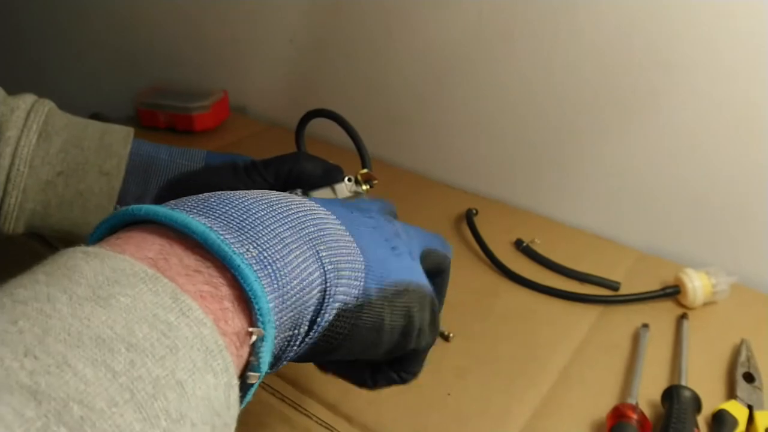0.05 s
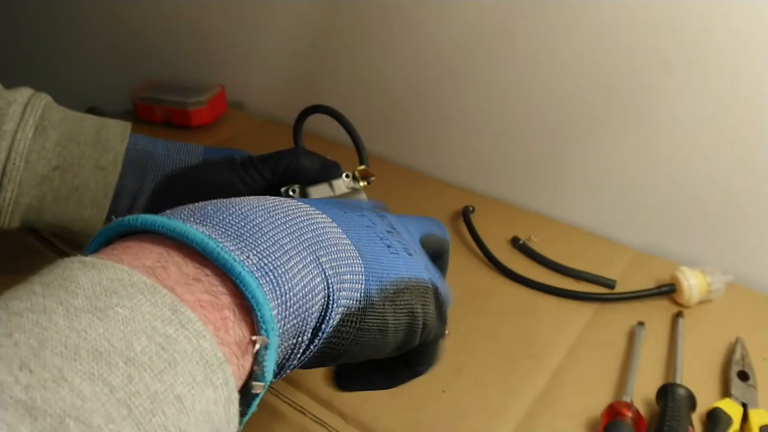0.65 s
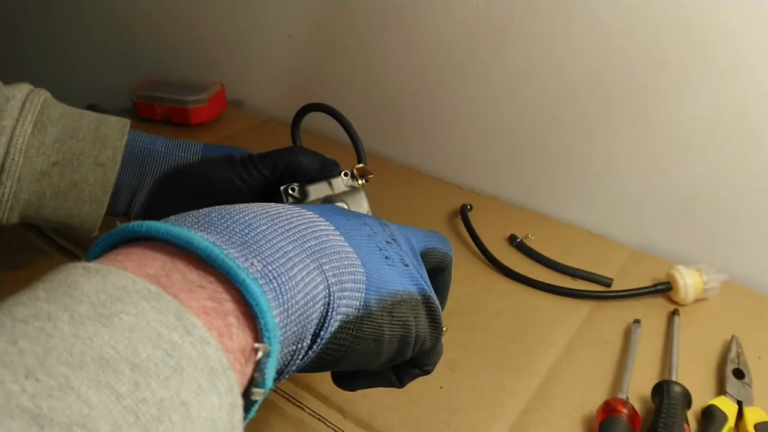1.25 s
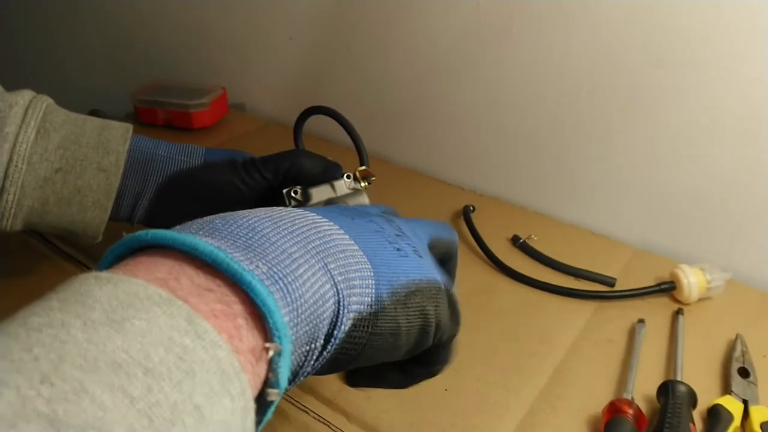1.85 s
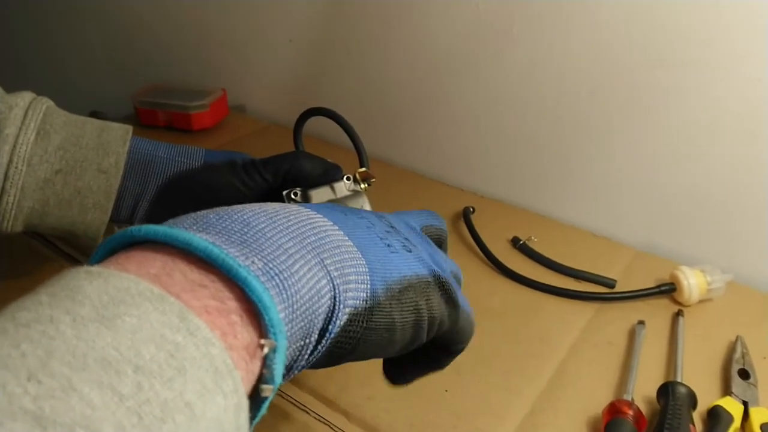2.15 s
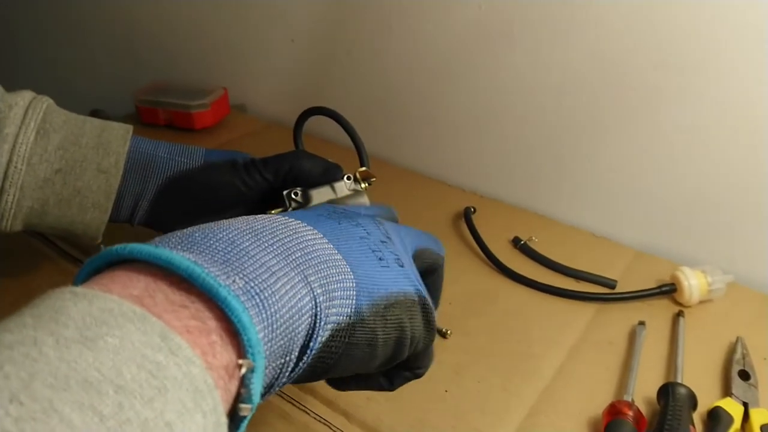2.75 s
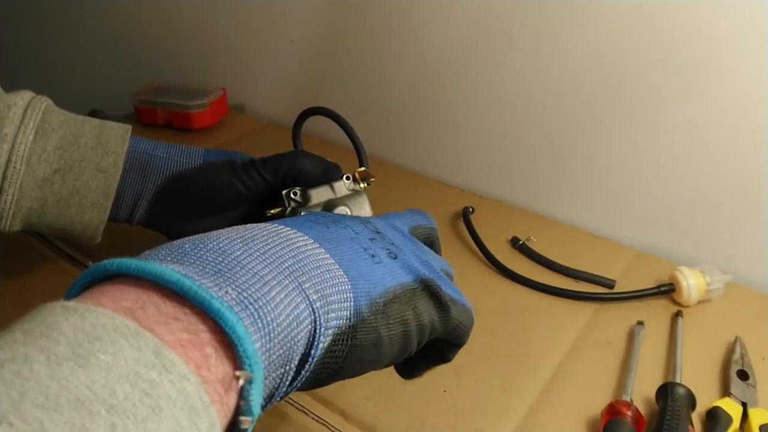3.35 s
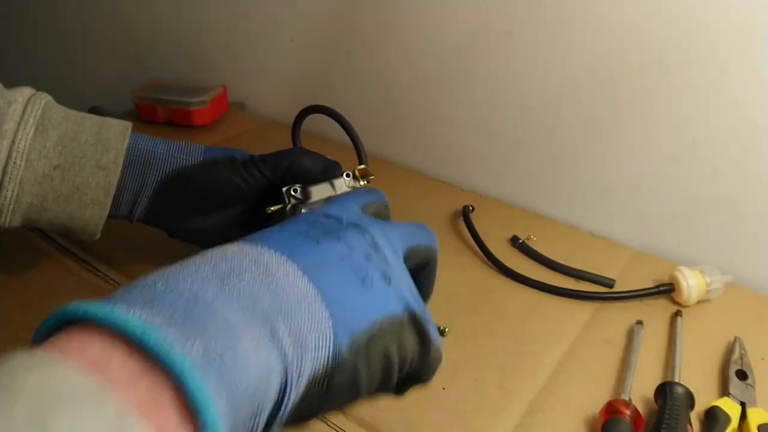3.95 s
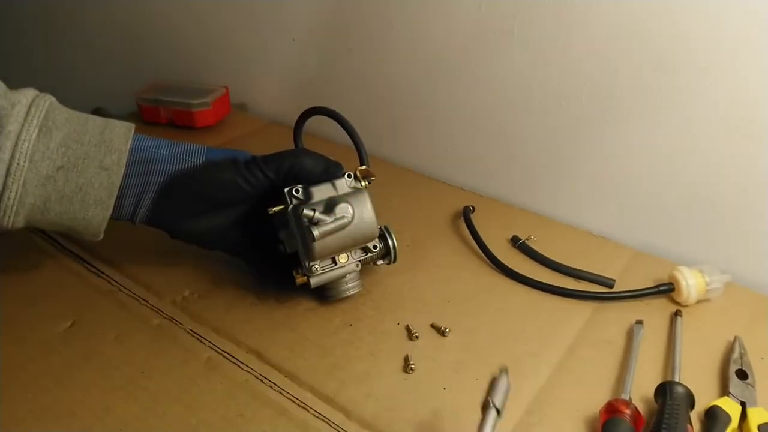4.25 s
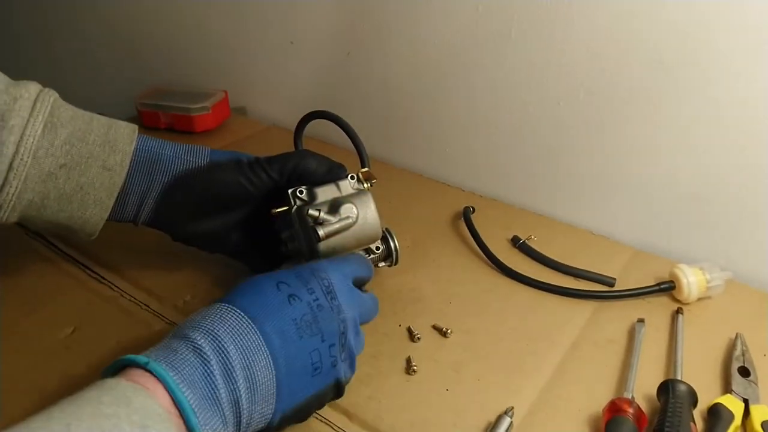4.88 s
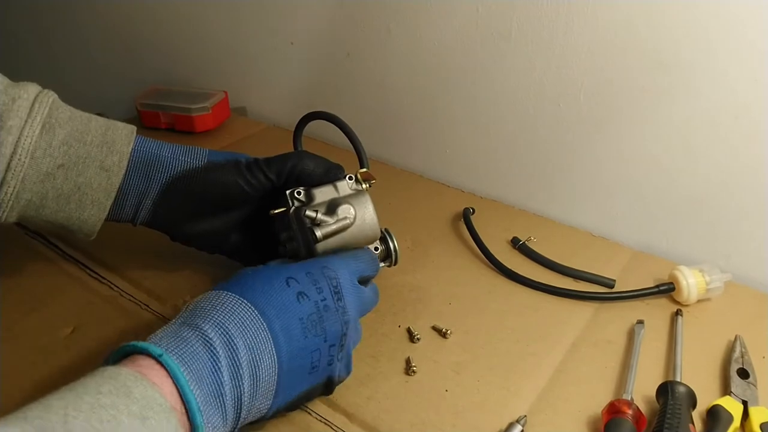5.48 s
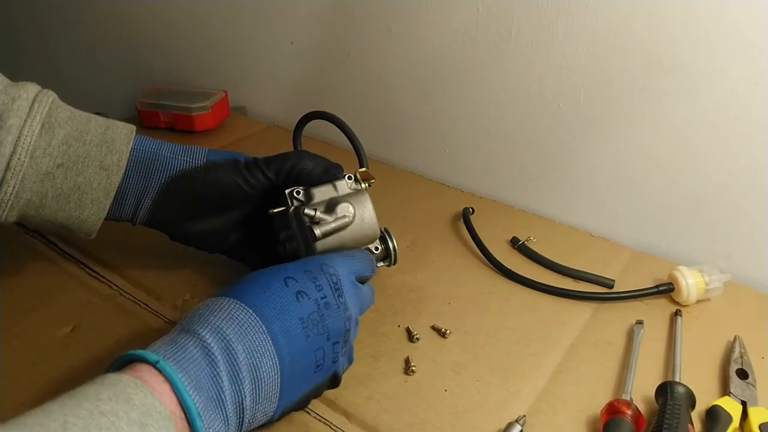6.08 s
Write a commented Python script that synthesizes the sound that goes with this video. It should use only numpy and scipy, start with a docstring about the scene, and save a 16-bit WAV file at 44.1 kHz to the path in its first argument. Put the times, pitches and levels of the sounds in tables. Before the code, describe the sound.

A screwdriver ticks and scrapes on a small metal part, lands on a workbench with a knock, and gloved fingers click on metal.

```python
"""A cardboard-covered workbench in a small, quiet room: gloved hands undo screws on a small carburettor.
Close to the microphone, the bit clicks and scrapes in the screw heads and rings the casting.
Gloves rub, sleeves swish, the bench rocks with each turn. The screwdriver is put down
(its shank clinks, its handle knocks), then fingers click on the metal parts."""
import sys
import numpy as np
from scipy import signal
from scipy.fft import rfft, irfft
from scipy.io import wavfile
from scipy.ndimage import uniform_filter1d

SR = 44100
rng = np.random.default_rng(int(sys.argv[2]) if len(sys.argv) > 2 else 0)


def pcm_store(signal):
    """Save signal as 16-bit PCM."""
    levels = np.round(np.clip(np.atleast_2d(signal), -1, 1) * 32767)
    wavfile.write(sys.argv[1], SR, levels.astype(np.int16).T)


N = 269803
TIME_S, HIT_TIME_S = np.arange(N) / SR, np.arange(SR) / SR
SCREW_OUT_S, SHANK_S, HANDLE_S = 4.31, 4.5152, 4.583

# Table levels are relative.
# bit and fingers on metal: (time [s], ring [dB], ring focus [Hz], bright edge [dB], tap [dB], thump [dB])
CLICKS = [(0.0296, -40, 4020, -78, -49.5, -47), (0.6474, -46, 4200, -78, -71, -58.5),
          (0.7365, -43.5, 5160, -59, -54.5, -49), (1.1603, -37, 4600, -55, -48.5, -48.5),
          (1.1728, -49, 4400, -64, -55, -42.5), (1.2103, -33.5, 4400, -51.5, -55.5, -63),
          (1.2619, -55, 3000, -75, -51, -51), (1.4338, -38, 4300, -76, -61.5, -70),
          (1.5976, -45.5, 2400, -85, -62, -74), (1.8051, -50.5, 4000, -68, -62, -58),
          (1.9135, -29.5, 4310, -59, -48.5, -46), (1.9788, -37.5, 4340, -59, -61, -56),
          (2.0919, -47, 4000, -81, -63.5, -64), (2.214, -44, 4110, -69, -63, -62),
          (2.3174, -48, 4400, -60, -60, -49.5), (2.6583, -53, 4000, -76.5, -66, -48),
          (2.7458, -51, 3030, -82, -68, -49.5), (2.9555, -54, 4000, -78, -75, -59),
          (3.022, -39, 4450, -60, -61.5, -45.5), (3.414, -47.5, 3980, -80, -78, -58),
          (3.5221, -33, 5000, -46, -53, -43), (3.5928, -31.5, 4400, -73, -62, -50),
          (3.9503, -40.5, 4360, -67, -69, -65), (4.6655, -37.5, 3700, -70, -57, -44),
          (4.7393, -36.5, 3640, -78, -55, -38), (4.7547, -37, 3680, -64, -53, -38.5),
          (4.8755, -35, 3720, -59, -56, -42.5), (4.8984, -44.5, 3700, -64, -58.5, -43),
          (4.9655, -48, 2400, -71, -51.5, -47), (4.9752, -31.5, 3230, -75, -51.5, -40.5),
          (5.037, -33, 5130, -45, -67, -52), (5.171, -42.5, 3700, -81.5, -60, -47),
          (5.1884, -43.5, 3700, -77, -61, -43), (5.211, -55, 3700, -79, -63.5, -43.5),
          (5.4014, -50.5, 4020, -83, -68.5, -64), (5.7234, -24.5, 4940, -36.5, -57.5, -72)]
# metal sliding on metal: (peak time [s], swell [s], fall [s], level [dB])
STROKES = [(.008, .005, .012, -59), (.308, 0.011, 0.017, -57.5), (.383, 0.025, 0.013, -58),
           (.748, 0.043, 0.033, -60.5), (1.158, 0.04, 0.017, -56), (1.528, 0.029, 0.012, -56),
           (1.893, 0.003, 0.041, -52), (1.995, .01, 0.022, -54.5), (2.222, .008, 0.0073, -58.5),
           (2.312, 0.029, 0.019, -56), (2.675, 0.022, 0.019, -56.5), (3.092, 0.03, 0.013, -54.5),
           (3.52, 0.037, 0.023, -56.5), (3.829, 0.0075, 0.013, -60), (3.92, 0.0077, 0.028, -48.5),
           (4.03, 0.011, 0.012, -63), (5.2, 0.025, 0.011, -61), (5.52, 0.011, 0.02, -64.5),
           (5.723, 0.0018, 0.0031, -41.5)]
# hand twists and leans on the bench: (time [s], hold [s], glove rub [dB], rocking [dB])
PUSHES = [(0.032, .02, -55, -49), (.13, .04, -70, -53), (.375, .07, -58, -47), (0.555, 0.008, -69, -56),
          (0.663, .01, -62, -60), (0.749, 0.033, -54, -49.5), (1.11, .03, -66, -56), (1.175, .06, -55, -46),
          (1.26, .01, -55, -48), (1.49, 0.085, -64, -57), (1.598, .04, -64, -47), (1.819, .02, -58, -56),
          (1.97, .06, -54, -45.5), (2.117, 0.014, -70, -47.5), (2.225, .03, -59, -49),
          (2.33, .02, -53, -48.5), (2.665, .02, -53, -50.5), (2.76, .04, -63, -42), (2.96, .03, -72, -53.5),
          (3.04, .17, -53, -52), (3.375, 0.044, -79, -54.5), (3.52, .13, -57, -44.5), (3.84, .03, -67, -54),
          (3.927, 0.062, -56, -44.5), (4.77, .02, -70, -42), (5.2, .03, -70, -50), (5.477, .01, -81, -58),
          (5.977, 0.017, -82, -57.5)]
# forearm shifts: (peak time [s], swell and fall [s], level [dB])
SWISHES = [(0, 0.057, -56), (.33, .05, -65), (.85, .12, -61), (1.12, 0.085, -60), (1.5, 0.1, -64.5),
           (1.9, 0.16, -61), (2.5, .09, -74), (3.98, 0.096, -63.5), (4.2, .12, -67)]

# modes: (frequency [Hz], level [dB], t60 [s])
CASTING_MODES = [(2477, -9, 0.075), (3063, -5, 0.036), (3400, -9, 0.06), (4270, 2.5, 0.035),
                 (4506, -3, 0.04), (4990, 2, 0.033), (6870, -12, .025)]
CARDBOARD_MODES = [(104.6, -1.5, 0.17), (133.4, -3.5, 0.2), (190.4, 0.5, 0.2), (259, -7.5, 0.058),
                   (287.5, -10.5, 0.092), (368.3, -7.5, 0.14), (487, -12, 0.069)]
SHANK_MODES = [(800, -16, 0.069), (1037, -18.5, 0.064), (1540, -23, 0.11), (2720, -19, 0.083),
               (3130, -2.5, 0.028), (3460, 0.5, 0.035), (3790, -3, 0.041), (4460, -8.5, .03),
               (4900, -6, 0.034), (6630, -10, 0.045), (7100, -13.5, 0.073)]
BENCH_MODES = [(119, -9, .4), (158, 0, .55), (192, -5, .3), (296, -7, .4), (342, -11, .33), (425, -12, .38),
               (501, -5, .25), (525, -7, .25), (563, -9, .3), (641, -15, .4), (686, -16, .38),
               (765, -9, .4), (819, -11, .31), (1031, -13, .25)]

# spectra: (frequency [Hz], level [dB])
CHATTER_EQ = [(900, -26), (2000, -5), (3300, 6.5), (4800, 1), (6000, -5.5), (7200, -10.5), (8500, -22),
              (14000, -28)]
EDGE_EQ = [(3500, -20.5), (5200, 4.5), (7200, 7), (8500, -2), (11000, -11), (13500, -7), (15300, -6)]
TAP_EQ = [(120, -6.5), (330, -3), (470, 0.5), (600, 4), (780, 0), (1100, -1), (1400, -5.5), (2200, -7.5),
          (3500, -29)]
SCRAPE_EQ = [(700, -13.5), (1700, -6), (2600, -1), (4200, -1.5), (5200, -6), (7200, -4.5), (8300, -14.5),
             (12000, -22.5), (15500, -23)]
CLINK_EQ = [(120, -26.5), (200, 7), (299, -22), (777, -7), (933, -14), (1100, -12.5), (1940, -19.5),
            (3490, -2.5), (5630, -13), (6760, -15.5), (10500, -29), (11100, -50.5), (12400, -30),
            (16000, -45)]
CRACK_EQ = [(150, -12), (500, 1), (1100, -0.5), (1500, -1.5), (2000, 3), (2350, -3), (4200, -4),
            (6500, -11.5), (9000, -22.5), (15000, -33)]
BOARD_EQ = [(50, -23), (95, 6), (150, 1.5), (195, 5), (270, 3), (380, -14), (520, -4.5), (680, -10),
            (900, -9), (1300, -18), (2500, -29), (6000, -48.5)]
SLEEVE_EQ = [(300, -13), (700, 4.5), (1000, -4.5), (1350, 2), (1700, -8), (2500, -4.5), (3500, -5),
             (5000, -11.5), (12000, -36)]
AIR_EQ = [(35, -27), (60, 0), (83, -2), (118, -10.5), (285, -22), (1100, -23.5), (1630, -23.5), (3580, -24),
          (7030, -28), (15500, -36.5)]
WEIGHT_EQ = [(60, -11), (200, 3), (700, -1), (1200, -12.5), (2500, -27), (5000, -23), (12000, -50)]
GLOVE_EQ = [(120, -19.5), (250, -9), (350, 4), (480, -3), (620, -10.5), (1500, -27), (4000, -43)]
ROOM_EQ = [(80, -14.5), (300, 1), (900, .5), (1700, -1.5), (3500, -1), (7000, -3), (15000, .5)]
# microphone ports: (frequency [Hz], left minus right [dB])
PORT_BALANCE = [(100, -1), (200, 2.5), (370, 6.5), (800, 1.5), (1600, -0.5), (2600, -2), (4300, -7.5),
                (5600, -5.5), (6800, 9.5), (8100, 2.5), (10000, 7.5), (11500, 1), (13000, 2.5), (15500, -4)]


def clicks(chatter_t60_s=.03, ping_db=-6, spot_db=3, focus_db=7, focus_ratio=1.24):
    """Metal chatters on metal, the casting rings, the blow passes into the cardboard."""
    out = np.zeros((2, N))
    cardboard = attack_level(ring(CARDBOARD_MODES, width=.26), -3)
    for time_s, ring_db, focus_hz, edge_db, tap_db, thump_db in CLICKS:
        # each spot on the casting favours other modes
        modes = [(hz, db + spot_db * rng.standard_normal(), t60_s) for hz, db, t60_s in CASTING_MODES]
        metal = burst(CHATTER_EQ, 0, chatter_t60_s, width=.88)
        metal += attack_level(ring(modes, width=1.6), ping_db)
        focus = [(focus_hz / focus_ratio, 0), (focus_hz, focus_db), (focus_hz * focus_ratio, 0)]
        add(out, time_s, attack_level(colour(metal, focus), ring_db - 13.5))
        add(out, time_s, burst(EDGE_EQ, edge_db - 1, t60_s=.04, width=.98))
        add(out, time_s, burst(TAP_EQ, tap_db - 1, t60_s=.041, width=.64))
        add(out, time_s, cardboard * undb(thump_db))
    return out


def scraping(slips_per_s=850, scatter_db=3.5, scratch_t60_s=.005, scratch_db=-.5, casting_db=-6):
    """Metal slips in tiny uneven steps; each is a short scratch that also rings the casting."""
    pressure = sum(undb(db) * swell(time_s, rise_s, fall_s) for time_s, rise_s, fall_s, db in STROKES)
    onsets = rng.random(N) < slips_per_s / SR
    slips = onsets * undb(scatter_db * np.minimum(rng.exponential(size=N), 3))
    grit = noise(width=.97, size=N) * np.sqrt(np.abs(convolve(slips ** 2, fade(scratch_t60_s))))
    scratch = unit(colour(grit, SCRAPE_EQ)) * undb(scratch_db)
    ringing = unit(convolve(grit, ring(CASTING_MODES, width=0))) * undb(casting_db)
    return pressure * (scratch + ringing)


def screwdriver():
    """The screwdriver lands shank first."""
    out = np.zeros((2, N))
    add(out, SHANK_S, shank())
    add(out, HANDLE_S, handle())
    return out


def shank(chatter_db=-25.5, ring_db=-26, thump_db=-35):
    """The steel shank chatters and rings briefly, damped by the cardboard."""
    chatter = burst(CLINK_EQ, chatter_db, t60_s=.048, width=.51)
    steel = attack_level(ring(SHANK_MODES, width=1.6), ring_db)
    thump = attack_level(ring(CARDBOARD_MODES, width=.25), thump_db)
    return chatter + steel + thump


def handle(crack_db=-24, settle_s=.0017, weight_db=-27, boom_db=-25, board_db=-28):
    """The hard handle cracks on the bench, its weight follows as a dull push, the top booms."""
    contact = undb(-17) * noise(width=.78) * fade(t60_s=.022)
    contact[:, 0] += 1  # impulse ahead of the rattle
    crack = attack_level(colour(contact, CRACK_EQ), crack_db)
    push = np.zeros_like(contact)
    push[:, int(settle_s * SR)] = 1
    weight = attack_level(colour(push, WEIGHT_EQ), weight_db)
    weak_modes = dense_tail(t60_s=.22, build_s=.0031, width=.43)
    board = attack_level(colour(weak_modes, BOARD_EQ), board_db)
    boom = attack_level(ring(BENCH_MODES, width=.93), boom_db)
    return crack + weight + boom + board


def gloves(attack_s=.016, t60_s=.23, sag_db_per_s=70, light_rub_db=-71):
    """Gloves rub the casting on the cardboard, slipping most as they bite, less as they settle."""
    pushes = [undb(db) * envelope(time_s, attack_s, hold_s, t60_s, sag_db_per_s)
              for time_s, hold_s, db, _ in PUSHES]
    light_rub = undb(light_rub_db) * envelope(0, attack_s, hold_s=SCREW_OUT_S, t60_s=1.6)
    cardboard = unit(convolve(noise(width=.12, size=N), np.diff(ring(CARDBOARD_MODES, width=.18))))
    rustle = unit(colour(noise(width=.4, size=N), GLOVE_EQ))
    return power_sum(pushes + [light_rub]) * (cardboard * undb(-2) + rustle * undb(-5))


def sleeves(gain_db=-4):
    """Cloth swishes as the forearm shifts."""
    motion = power_sum(undb(db) * swell(time_s, span_s, span_s) for time_s, span_s, db in SWISHES)
    return unit(colour(noise(width=.84, size=N), SLEEVE_EQ)) * motion * undb(gain_db)


def rocking(mode_hz=68, t60_s=.35, lag_s=.017, jolt_db=-36, light_sway_db=-73):
    """The lowest bench mode, pushed unevenly by the hands and jolted by the screwdriver."""
    sway = convolve(rng.standard_normal(N), ring([(mode_hz, 0, t60_s)], width=0))
    sway = convolve(sway, ring([(mode_hz, 0, t60_s / 4)], width=0))
    power = uniform_filter1d(sway[0] ** 2, int(.0308 * SR))
    even_sway = sway / np.sqrt(np.abs(power) + 1e-9)
    pushes = [undb(db) * envelope(time_s + lag_s, attack_s=.021, hold_s=hold_s, t60_s=.27)
              for time_s, hold_s, _, db in PUSHES]
    jolt = undb(jolt_db) * envelope(SHANK_S + lag_s, attack_s=.01, hold_s=HANDLE_S - SHANK_S, t60_s=1.35)
    return even_sway * power_sum(pushes + [jolt, undb(light_sway_db)])


def room(x, t60_s=.41, wet_db=-7):
    """Near walls return a dense tail, different at each port."""
    tail = dense_tail(t60_s, build_s=.0023, width=.93)
    tail /= np.sqrt(np.sum(tail ** 2) / 2)
    return undb(wet_db) * colour(convolve(x, tail), ROOM_EQ)


def air(above_100_hz_db=-65):
    """Low room rumble and even microphone hiss."""
    hiss = colour(noise(width=.98, size=N), AIR_EQ)
    return hiss / np.std(high_pass(hiss, 100, order=4)) * undb(above_100_hz_db)


def undb(db):
    return 10 ** (np.asarray(db) / 20)


def unit(x):
    return x / np.sqrt(np.mean(x ** 2))


def power_sum(levels):
    return np.sqrt(sum(level ** 2 for level in levels))


def attack_level(x, db):
    """Set the rms of the first 12 ms."""
    return x * undb(db) / np.sqrt(np.mean(x[..., HIT_TIME_S < .012] ** 2))


def add(track, time_s, sound):
    start = int(time_s * SR)
    track[:, start:start + sound.shape[1]] += sound[:, :N - start]


def convolve(x, response):
    return signal.fftconvolve(np.atleast_2d(x), np.atleast_2d(response), axes=1)[:, :x.shape[-1]]


def high_pass(x, hz, order):
    return signal.sosfilt(signal.butter(order, hz, "high", fs=SR, output="sos"), x)


def colour(x, eq, size=4096):
    """Minimum-phase filter through the points of a spectrum."""
    hz, db = np.transpose(eq)
    bins_hz = np.maximum(np.arange(size // 2 + 1) * SR / size, 1)
    cepstrum = irfft(np.log(undb(np.interp(np.log(bins_hz), np.log(hz), db))))
    cepstrum[1:size // 2] *= 2
    cepstrum[size // 2 + 1:] = 0
    return convolve(x, irfft(np.exp(rfft(cepstrum))))


def fade(t60_s):
    return np.exp(-np.log(1000) * HIT_TIME_S / t60_s)


def swell(peak_s, rise_s, fall_s):
    return np.exp(-((TIME_S - peak_s) / np.where(TIME_S < peak_s, rise_s, fall_s)) ** 2 / 2)


def envelope(peak_s, attack_s, hold_s, t60_s, sag_db_per_s=0):
    """Rise, sagging hold, decay."""
    age_s = TIME_S - peak_s
    rise = np.exp(-(np.minimum(age_s, 0) / attack_s) ** 2 / 2)
    sag = undb(-sag_db_per_s * np.clip(age_s, 0, hold_s))
    return rise * sag * np.exp(-np.log(1000) * np.maximum(age_s - hold_s, 0) / t60_s)


def noise(width, size=SR):
    """Stereo noise; width is side over mid."""
    mid, side = rng.standard_normal((2, size))
    return unit(np.array([mid + width * side, mid - width * side]))


def burst(eq, db, t60_s, width):
    return attack_level(colour(noise(width) * fade(t60_s), eq), db)


def dense_tail(t60_s, build_s, width):
    return noise(width) * fade(t60_s) * (1 - np.exp(-HIT_TIME_S / build_s))


def ring(modes, width):
    """Damped modes; width is the phase difference between ports [rad]."""
    phases_rad = width * rng.choice([-1, 1], len(modes)) / 2
    sides = np.array([[1], [-1]])
    return sum((-1) ** k * undb(db) * fade(t60_s)
               * np.sin(2 * np.pi * hz * HIT_TIME_S + sides * phases_rad[k])
               for k, (hz, db, t60_s) in enumerate(modes))


def scene():
    """Everything on the bench, in its room."""
    bench = clicks() + screwdriver() + scraping() + gloves() + sleeves()
    return bench + room(bench) + rocking() + air()


def record(dry, mono_below_hz=320, right_lag_samples=4, low_cut_hz=48, top_hz=15700):
    """Two close ports: shared bass, the right slightly late, each with its own resonances; band-limited."""
    mid = (dry[0] + dry[1]) / 2
    side = high_pass((dry[0] - dry[1]) / 2, mono_below_hz, order=2)
    left = colour(mid + side, [(hz, db / 2) for hz, db in PORT_BALANCE])
    delayed = np.pad(mid - side, (right_lag_samples, 0))[:N]
    right = colour(delayed, [(hz, -db / 2) for hz, db in PORT_BALANCE])
    ports = high_pass(np.vstack([left, right]), low_cut_hz, order=4)
    return signal.sosfilt(signal.ellip(10, .2, 80, top_hz, fs=SR, output="sos"), ports)


dry = scene()
out = record(dry)
pcm_store(out)
```